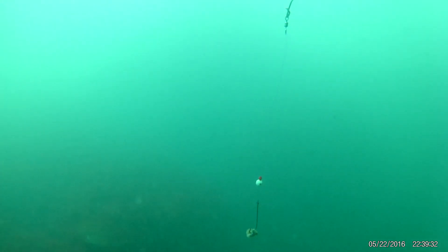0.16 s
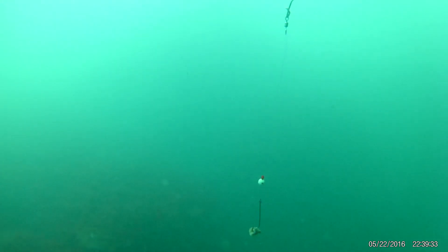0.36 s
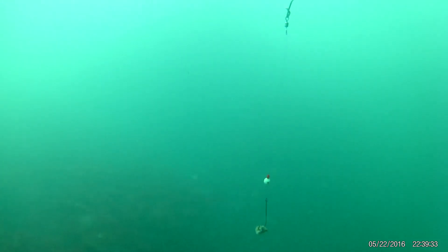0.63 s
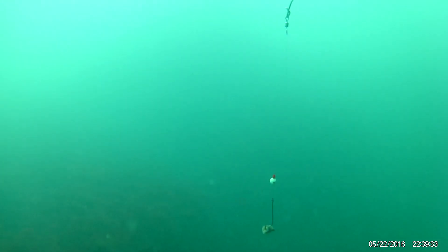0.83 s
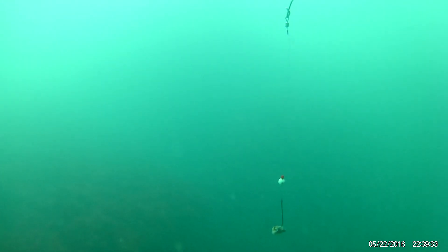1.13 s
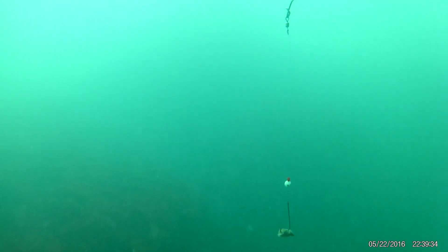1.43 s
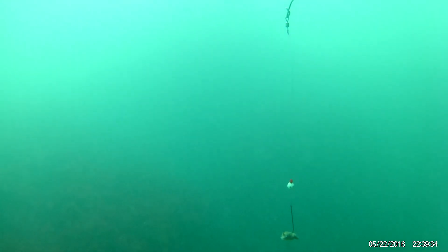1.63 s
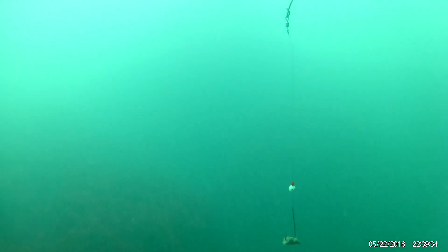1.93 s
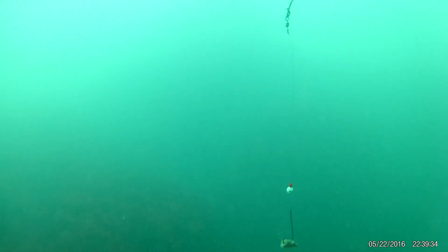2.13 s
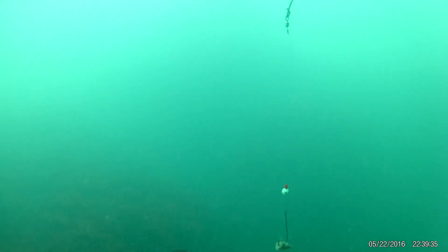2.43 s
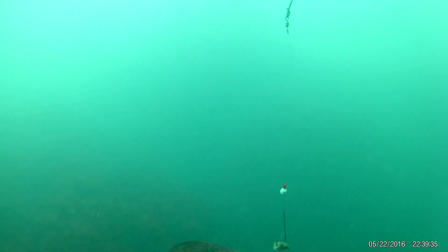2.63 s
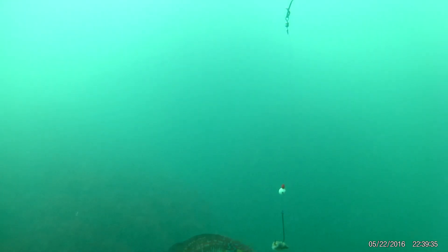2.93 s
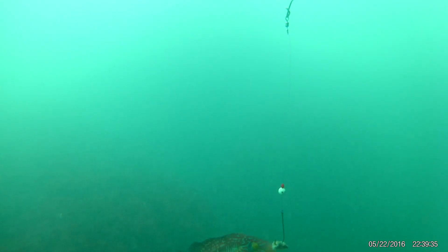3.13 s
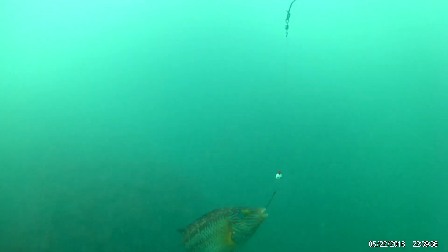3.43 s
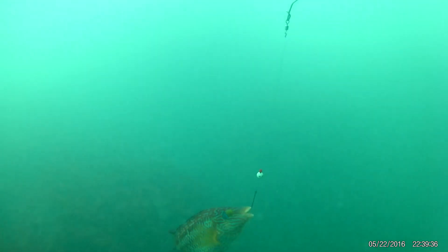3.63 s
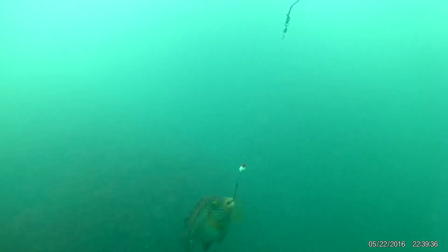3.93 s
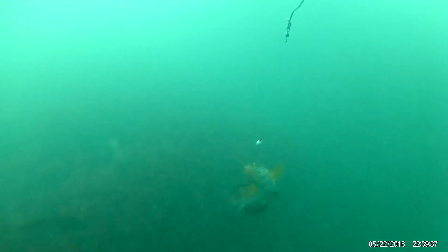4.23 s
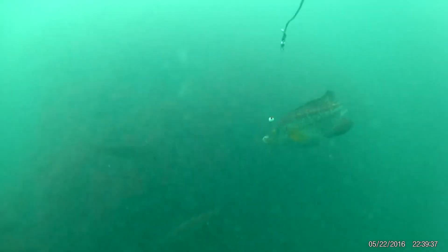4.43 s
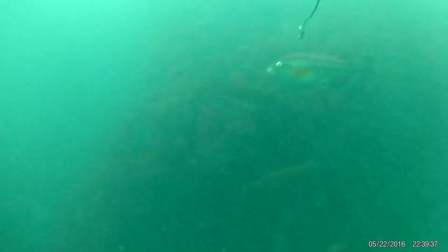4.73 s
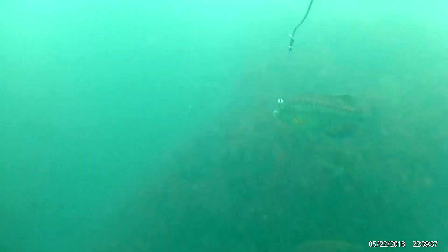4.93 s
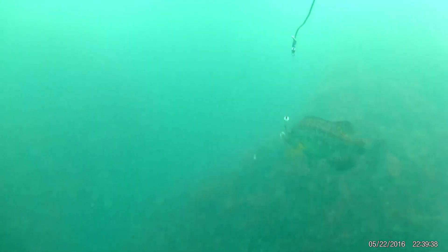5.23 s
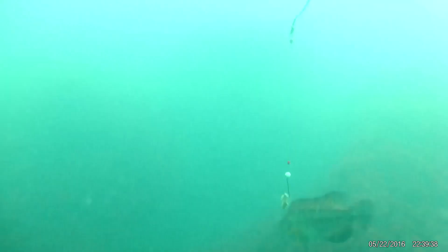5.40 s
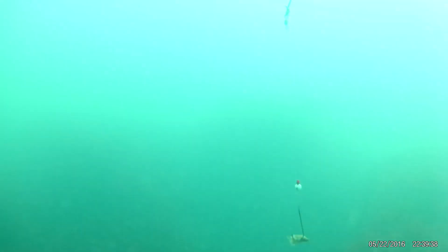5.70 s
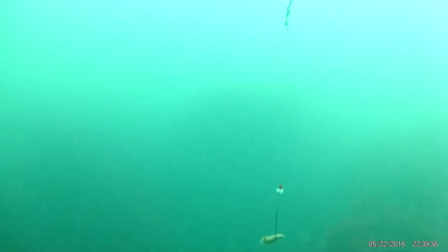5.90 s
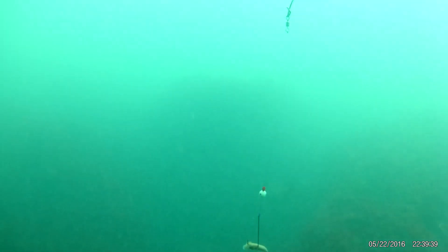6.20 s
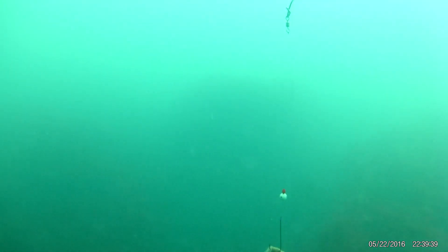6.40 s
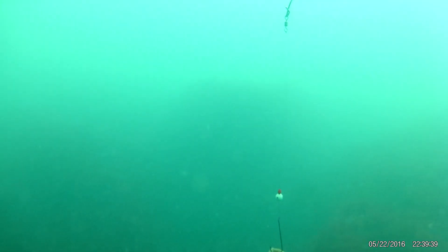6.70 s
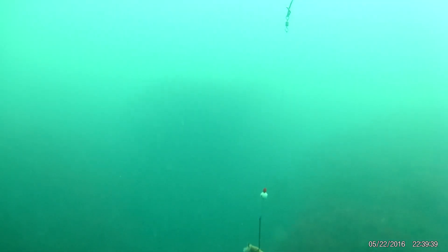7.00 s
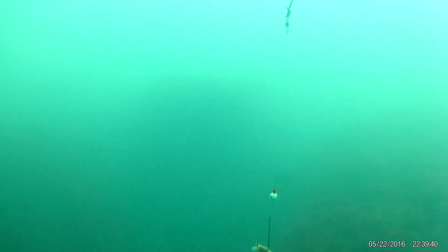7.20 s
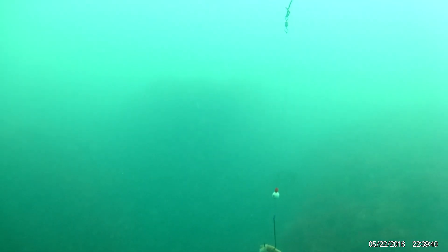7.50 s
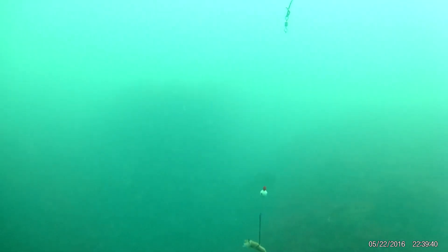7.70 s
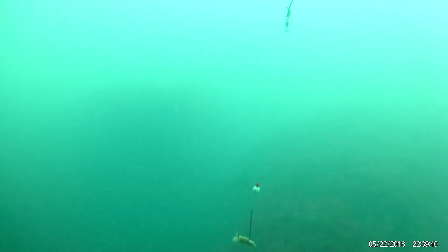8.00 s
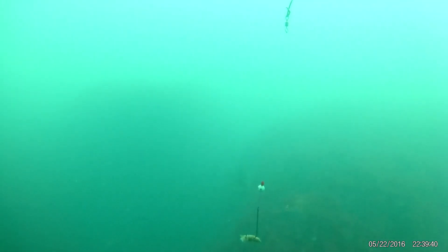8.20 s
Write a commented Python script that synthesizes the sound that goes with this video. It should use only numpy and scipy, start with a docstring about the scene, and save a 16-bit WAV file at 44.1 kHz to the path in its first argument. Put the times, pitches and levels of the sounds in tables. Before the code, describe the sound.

From 0 to 3.2 seconds a quiet, steady, muffled water hum fills a closed plastic case, with faint hiss, tiny ticks and soft bubble blips, the clearest near 0.35. At 3.24 a fish strikes: several very hard, hollow knocks within 50 milliseconds, overloading the microphone, with bright plastic chatter and a short burst of low turbulence. Small tackle taps fade by 3.5. A weak bump and light line creeping come around 3.9 to 4.25. At 4.3 to 4.45 heavy low jerks, a deep bubble-like thump, grinding, rattle, tiny metal clinks and short squeaks crowd together. Another tug at 4.65 to 4.9 brings thuds and a string of chirpy squeaks sliding down, with lower faint groans until 5.27. Soft bumps at 5.35 and 5.45, light taps and creeping until about 6.1, two small ticks near 6.55, a soft bubble ring at 7.5, and dull hum to the end.

```python
"""Under water, inside a watertight camera housing hung on a fishing line above a baited hook.
Coloured noise hums dully through the case, with small ticks and bubbles ringing as dying sines.
A fish strikes: blows ring the housing's modes, tackle chatters on its shell, and lurches stir up turbulence.
The rig is dragged off in jerks; the taut line rasps and clinks in bursts of tiny contacts.
Its stick-slip squeaks fall in pitch as it slackens; then creeping, a few ticks and bubbles, and the hum."""
import sys
import numpy as np
from scipy import signal
from scipy.fft import rfft, irfft
from scipy.io import wavfile

SR = 44100
rng = np.random.default_rng(int(sys.argv[2]) if len(sys.argv) > 2 else 0)


def materialize(psi):
    """Save the field psi as 16-bit PCM at rate SR to the path in sys.argv[1].

    A 1-D psi becomes a single channel; in a 2-D psi each row is a channel.
    """
    bounded = np.clip(np.atleast_2d(psi).T, -1, 1)
    quanta = np.round(bounded * 32767).astype(np.int16)
    wavfile.write(sys.argv[1], SR, quanta)


N = 368224
T = np.arange(N) / SR  # seconds

# colour of the water noise inside the case: (frequency [Hz], relative density [dB per Hz])
WATER_COLOUR = [(20, -25), (31, -14), (45, -9.5), (75, -0.5), (125, -14.5), (180, -11.5), (250, -6),
                (320, -8), (480, -4), (640, -6.5), (800, -16.5), (1080, -33), (1500, -39.5), (2400, -43.5),
                (4000, -57)]
# air resonances of the case, stirred by the water: (frequency [Hz], width [Hz], level [dB])
CASE_AIR = [(543.8, 24.6, -50.5), (606.8, 26.6, -53), (1285, 105, -68), (2710, 230, -87)]
# colour of the microphone hiss: (frequency [Hz], relative density [dB per Hz])
HISS_COLOUR = [(1500, -0.5), (3000, -3.5), (5000, -8.5), (8000, -16.5), (12000, -17.5), (15500, -10.5)]
WATER_DB, HISS_DB = -46, -75  # rms levels

# sharp ticks out in the water: (time [s], level [dB])
WATER_TICKS = [(.0604, -39), (.328, -43), (0.9633, -43), (1.995, -40.5), (6.5281, -42), (6.6094, -36)]
# bubbles ringing near the case: (time [s], frequency [Hz], level [dB], t60 [s])
BUBBLE_RINGS = [(0.343, 603, -25.5, 0.15), (0.536, 556, -36.5, 0.16), (1.45, 1356, -53.5, 0.18),
                (1.537, 2830, -46, 0.019), (2.416, 2660, -52, 0.025), (2.557, 2840, -42, 0.011),
                (3.768, 775, -33, 0.031), (4.3079, 252, -2.5, 0.027), (4.964, 236.4, -4.5, 0.073),
                (6.265, 886, -50, 0.15), (7.52, 550, -29.5, 0.3)]

# lurches of the case, buffeted by water: (time [s], level [dB], fall [dB/s])
CASE_LURCHES = [(3.262, -7, 191), (3.95, -43.5, 11), (4.318, -22.5, 61), (4.7, -33, 18), (5.55, -42, 22)]
# colour of that turbulence: (frequency [Hz], relative density [dB per Hz])
TURBULENCE_COLOUR = [(20, -6.5), (48, 1), (75, 0.5), (110, -8.5), (190, -6.5), (300, -20.5), (600, -15),
                     (1000, -40), (2000, -95.5)]
LURCH_RISE_S = 0.035
# fainter eddies start with each lurch, at a level relative to it, and outlast only the fast-falling ones
EDDY_DB, EDDY_FALL_DB_PER_S = -32.5, 31

# hard blows on the rig: (time [s], impulse [dB], contact [ms], tackle chatter [dB])
BLOWS = [(3.2367, 0.5, 1.1, -30), (3.2436, -1, 0.71, -24.5), (3.2535, -5.5, 0.98, -28.5),
         (3.2629, -18.5, 0.35, -24), (3.2837, -22, 0.36, -23), (3.896, -25.5, 5.6, -69),
         (4.311, -13, 1.8, -40.5), (4.377, -22.5, 3.1, -34), (4.667, -17.5, 1.96, -57),
         (5.349, -31.5, 1.6, -70), (5.449, -20.5, 1.64, -53)]
# low modes of housing and mount: (frequency [Hz], level [dB], t60 [s])
HOUSING_MODES = [(49.7, -20.5, 1), (60, -38, 0.5), (87.5, -38.5, 0.3), (108.6, -6, 0.29),
                 (127.2, -29, 0.37), (176, -19, 0.21), (188.1, -12.5, 0.28), (242.3, -5.5, 0.11),
                 (284, -13, 0.086), (366, -10.5, 0.24), (434.8, -10, 0.084), (522, -12, 0.25),
                 (608.8, -12, 0.36), (622.5, -13, 0.28), (734, -26.5, 0.3), (850, -21, 0.15),
                 (875, -36, 0.22), (1138, -29.5, 0.33), (1308, -42, 0.28)]

# swivel and clip swinging against the case: (time [s], level [dB])
TACKLE_TOUCHES = [(3.302, -32), (3.3145, -27.5), (3.335, -26), (3.3755, -42.5), (3.395, -45.5),
                  (3.433, -53), (3.465, -54.5), (3.809, -57.5), (3.9143, -61), (4.346, -37), (4.400, -39),
                  (4.4085, -33.5), (4.4215, -62), (4.443, -47), (4.743, -49.5), (5.371, -57), (5.409, -58),
                  (5.585, -51.5), (5.609, -44), (5.724, -51.5), (5.748, -50.5)]
# wall resonances of the plastic shell: (frequency [Hz], width [Hz], relative level [dB])
SHELL_MODES = [(1570, 110, -0.5), (1882, 85, 7.5), (2156, 75, 2), (2272, 93, 7.5), (2390, 52, 2.5),
               (2810, 120, 4.5), (2973, 140, 4), (3230, 88, -0.5), (3840, 120, 2), (4095, 180, 1.5),
               (4480, 54, -9), (4410, 69, -2), (5800, 71, -17), (6070, 160, -9), (6220, 130, -15.5),
               (6900, 120, -20.5), (8850, 130, -17.5), (10400, 400, -17)]
# a touch of -30 dB is cut above CHATTER_HZ; the cut rises an octave per DB_PER_OCTAVE of force
CHATTER_HZ, DB_PER_OCTAVE = 7500, 22
# time constants of the chatter's build-up and decay, and of the faint buzz it leaves behind
CHATTER_RISE_MS, CHATTER_MS, BUZZ_DB, BUZZ_MS = 1.4, 5.4, -24, 14.4

# line creeping over the shell under light tension: (time [s], hold [s], level [dB])
LINE_SLIDES = [(3.894, 0.052, -69.5), (4.083, .135, -63.5), (4.251, 0.069, -61), (4.485, .02, -67.5),
               (4.66, 0.034, -64), (5.6, 0.2, -70.5), (5.938, 0.082, -71.5)]
# wall resonances the creeping line picks out: (frequency [Hz], width [Hz], relative level [dB])
CREEP_MODES = [(1530, 37, -5), (1895, 93, 2.5), (2160, 57, 3), (2400, 80, -1), (2820, 150, -5),
               (3220, 200, -16.5), (4010, 250, -16)]
SLIDE_RISE_S, SLIDE_FALL_DB_PER_S = 0.022, 170
SLIDE_RASP_DB = -4.5  # rasp effort relative to the creep

# stick-slip squeaks of the line:
# (time [s], length [s], first pitch [Hz], last pitch [Hz], level [dB], relative second harmonic [dB])
LINE_SQUEAKS = [(4.069, 0.082, 192, 198, -41, -19), (4.085, 0.13, 588, 639, -41, -29),
                (4.317, 0.081, 526, 570, -28, -25), (4.404, 0.013, 595, 582, -16, -25),
                (4.423, .02, 599, 553, -17, -32), (4.436, 0.035, 525, 600, -27.5, -36),
                (4.719, 0.022, 568, 603, -26.5, -33), (4.752, .018, 610, 584, -23.5, -27),
                (4.771, 0.022, 538, 516, -24.5, -31), (4.796, 0.029, 578, 539, -23.5, -20),
                (4.826, 0.027, 521, 554, -22.5, -30.5), (4.846, 0.055, 418, 345, -27, -35),
                (4.898, .07, 339.5, 288.4, -38.5, -14.5), (5.05, 0.096, 200, 199.4, -32, -29.5),
                (5.144, 0.05, 188.6, 196, -32.5, -32), (5.19, 0.078, 137, 132, -41, -27)]
SQUEAK_ARCH = 0.49  # power of the sine arch on which each squeak swells and fades

# pulls dragging line and case over the mount:
# (time [s], hold [s], grinding [dB], rasp effort [dB], fall [dB/s])
LINE_PULLS = [(4.307, 0.03, -28, -46.5, 296), (4.412, 0.033, -25, -50.5, 650),
              (4.731, 0.015, -32.5, -48, 477), (4.791, .015, -43, -63.5, 89)]
# mount resonances stirred by the grinding: (frequency [Hz], width [Hz], relative level [dB])
MOUNT_MODES = [(394, 160, 10.5), (650, 72, 3), (810, 200, -4.5), (1100, 98, -9.5), (1190, 130, -7),
               (1350, 200, -15.5), (1840, 300, -24.5)]
GRIP_S = .02  # rise of a pull

# line jerks shoving the case through the water: (time [s], level [dB], length [ms])
LINE_JERKS = [(4.302, -5.5, 6.3), (4.332, -4.5, 9.6), (4.438, -8.5, 12), (4.652, -12.5, 12),
              (4.738, -14.5, 8.7)]
RECOIL, RECOIL_DELAY = 0.27, .75  # the mount springs back: share of the shove, delay in shove lengths

# swivel clinking as the line snaps taut: (time [s], level [dB])
SWIVEL_CLINKS = [(4.377, -50), (4.401, -52), (4.41, -48.5), (4.423, -61), (4.668, -74)]
CLINK_HZ, CLINK_WIDTH_HZ = 6020, 510
CLINK_RISE_S, CLINK_FALL_DB_PER_S = 0.002, 1198  # the rise time is also the hold

CUTOFF_HZ = 15800  # top of the recorded band


def from_db(db):
    """Decibels to gain."""
    return 10 ** (np.asarray(db) / 20)


def rms_one(x):
    """Scale to unit rms."""
    return x / np.sqrt(np.mean(x ** 2) + 1e-20)


def drift(rate_hz):
    """Slow random wander of rms 1, made at a fortieth of the sample rate and interpolated."""
    r = np.exp(-80 * np.pi * rate_hz / SR)
    draws = rng.standard_normal(N // 40 + 2002)
    slow = signal.lfilter([1], [1, -2 * r, r * r], draws)[2000:]  # drop the filter's start
    return np.interp(np.arange(N) / 40, np.arange(len(slow)), rms_one(slow))


def noise(colour):
    """Steady noise of a given colour, rms 1, thinning out below the first frequency."""
    hz, db = np.transpose(colour)
    bins = np.maximum(np.fft.rfftfreq(N, 1 / SR), 1)
    gain = from_db(np.interp(np.log(bins), np.log(hz), db))
    gain = gain * np.minimum(bins / hz[0], 1)
    return rms_one(irfft(rfft(rng.standard_normal(N)) * gain, N))


def cut(x, hz, kind, order=2):
    """Butterworth high- or low-pass."""
    sos = signal.butter(order, min(hz, .45 * SR), kind, fs=SR, output="sos")
    return signal.sosfilt(sos, x + 1e-18)


def resonance(x, hz, width):
    """Two-pole band-pass with a gain of about 1 on top."""
    r = np.exp(-np.pi * width / SR)
    feedback = [1, -2 * r * np.cos(2 * np.pi * hz / SR), r * r]
    return signal.lfilter(np.array([1, 0, -1]) * (1 - r * r) / 2, feedback, x + 1e-18)


def ring(force, hz, t60):
    """A decaying mode: a unit click sets a sine of starting height 1 ringing."""
    r, w = np.exp(-np.log(1000) / (t60 * SR)), 2 * np.pi * hz / SR
    return signal.lfilter([0, np.sin(w)], [1, -2 * r * np.cos(w), r * r], force + 1e-18)


def push(s, ms):
    """A smooth one-sided pulse of height 1."""
    part = (T - s) * 1000 / ms
    inside, out = (part > 0) & (part < 1), np.zeros(N)
    out[inside] = np.sin(np.pi * part[inside]) ** 2
    return out


def grains(per_s, spread_db):
    """Tiny contacts of uneven size at random moments, rms 1."""
    sizes = from_db(spread_db * np.minimum(rng.exponential(1, N), 3))
    sizes = sizes * rng.choice([-1, 1], N)
    return rms_one(sizes * (rng.random(N) < per_s / SR))


def swell(s, hold_s, rise_s, fall_db_per_s):
    """Gain that reaches 1 at time s, holds, then dies away."""
    rise = np.clip(1 + (T - s) / rise_s, 0, 1) ** 2
    return rise * from_db(-abs(fall_db_per_s) * np.maximum(T - s - hold_s, 0))


def together(gains):
    """Joint gain of unrelated swells: their powers add."""
    return np.sqrt(sum(gain ** 2 for gain in gains))


def shell(force, thud_db, thud_hz, top_hz=9000):
    """Small contacts ring the plastic walls and thud dully inside."""
    walls, power = 0, 0
    for hz, width, db in SHELL_MODES:
        walls = walls + from_db(db) * resonance(resonance(force, hz, width), hz, 8 * width)
        power += from_db(db) ** 2 * np.pi * width / SR
    thud = from_db(thud_db) * cut(cut(force, thud_hz, "low"), 240, "high")
    # dividing by the walls' noise gain keeps the level in hand
    return (cut(walls, top_hz, "low") + cut(thud, 1500, "low", order=3)) / np.sqrt(power)


def friction(effort, bands, per_s, uneven_db, top_hz):
    """Dense small slips ring a set of resonances; the case muffles what lies above them."""
    slips = grains(per_s, spread_db=1.0) * from_db(uneven_db * drift(50))
    sound = sum(from_db(db) * resonance(resonance(slips, hz, width), hz, 5 * width)
                for hz, width, db in bands)
    return effort * rms_one(cut(sound, top_hz, "low", order=4))


def hum(waver_db=-0.18):
    """Gently wavering water noise and the air resonances it stirs, over steady microphone hiss."""
    water = from_db(WATER_DB) * noise(WATER_COLOUR)
    for hz, width, db in CASE_AIR:
        stirred = resonance(rng.standard_normal(N), hz, width)
        water = water + from_db(db) * rms_one(resonance(stirred, hz, 4 * width))
    return water * from_db(waver_db * drift(2.8)) + from_db(HISS_DB) * noise(HISS_COLOUR)


def ticks(ping_hz=2750, ping_width=260, ping_db=9):
    """Lone clicks carried through the water ping the shell."""
    force = np.zeros(N)
    for s, db in WATER_TICKS:
        force[round(s * SR)] += from_db(db)
    ping = from_db(ping_db) * resonance(force, ping_hz, ping_width)
    return shell(force, thud_db=1, thud_hz=1510, top_hz=3000) + ping


def bubbles(swell_s=0.0022):
    """Each bubble swells within milliseconds and rings out as a dying sine."""
    out = np.zeros(N)
    for s, hz, db, t60 in BUBBLE_RINGS:
        on = (T > s) & (T < s + 2 * t60)
        age = T[on] - s
        gain = from_db(db) * (1 - np.exp(-age / swell_s)) * np.exp(-np.log(1000) * age / t60)
        out[on] += gain * np.sin(2 * np.pi * hz * age)
    return out


def wake():
    """Turbulence flares and dies away at each lurch, with fainter eddies under it."""
    flare = together(from_db(db) * swell(s, 0, LURCH_RISE_S, fall) for s, db, fall in CASE_LURCHES)
    eddies = together(from_db(db + EDDY_DB) * swell(s, 0, LURCH_RISE_S, EDDY_FALL_DB_PER_S)
                      for s, db, _ in CASE_LURCHES)
    return together([flare, eddies]) * noise(TURBULENCE_COLOUR)


def knocks(leak_hz=40):
    """Blows ring the housing; a longer contact leaves only the lowest modes, and the slowest push leaks away."""
    force = np.zeros(N)
    for s, db, ms, _ in BLOWS:
        contact = push(s, ms)
        force += from_db(db) * contact / (contact.sum() + 1e-9)  # equal impulse at any length
    ringing = sum(from_db(db) * ring(force, hz, t60) for hz, db, t60 in HOUSING_MODES)
    return cut(ringing, leak_hz, "high")


def rattle(first_db=2, chatter_db=3):
    """Each touch of the tackle is a crack and a short dying chatter; harder touches are brighter."""
    force, chatter = np.zeros(N), from_db(chatter_db) * grains(per_s=2900, spread_db=2.5)
    touches = [(s, db) for s, _, _, db in BLOWS] + list(TACKLE_TOUCHES)
    for s, db in touches:
        on = (T >= s) & (T < s + .15)
        ms = (T[on] - s) * 1000
        dying = np.exp(-ms / CHATTER_MS) + from_db(BUZZ_DB) * np.exp(-ms / BUZZ_MS)
        touch = chatter[on] * dying * (1 - np.exp(-ms / CHATTER_RISE_MS))
        touch[0] += from_db(first_db)  # the crack
        bright_hz = CHATTER_HZ * 2 ** ((db + 30) / DB_PER_OCTAVE)
        force[on] += from_db(db) * cut(touch, bright_hz, "low")
    return shell(force, thud_db=-4.5, thud_hz=970)


def rubbing():
    """How hard the rig grinds, creeps and rasps: pulls grind, slides creep, and both rasp the line."""
    pulls = [(swell(s, hold, GRIP_S, fall), grind_db, rasp_db)
             for s, hold, grind_db, rasp_db, fall in LINE_PULLS]
    grinding = together(from_db(db) * pull for pull, db, _ in pulls)
    creeping = together(from_db(db) * swell(s, hold, SLIDE_RISE_S, SLIDE_FALL_DB_PER_S)
                        for s, hold, db in LINE_SLIDES)
    pull_rasps = [from_db(db) * pull for pull, _, db in pulls]
    rasping = together(pull_rasps + [from_db(SLIDE_RASP_DB) * creeping])
    return grinding, creeping, rasping


def creep(effort):
    """The line slips lightly over the shell and picks out some of its wall resonances."""
    return friction(effort, CREEP_MODES, per_s=1600, uneven_db=5.5, top_hz=4400)


def rasp(effort, uneven_db=0.5):
    """The line catches on its mount in dense small slips."""
    strength = effort * from_db(uneven_db * drift(24))
    slips = strength * grains(per_s=2000, spread_db=13.5)
    return shell(slips, thud_db=16.5, thud_hz=950, top_hz=5000)


def squeaks(effort, jitter=0.023, rough_db=24, shimmer_db=1.14, third_db=-35,
            case_hz=605, case_width=70, case_db=23, muffle_hz=1150, snap_db=-16):
    """Stick-slip tones roughen with the rasp; overtones swell near a case resonance, and slips snap."""
    unevenness = np.minimum(from_db(rough_db) * effort, .3)
    waver = 1 + jitter * drift(49) + unevenness * drift(160)  # pitch factor
    flutter = shimmer_db * drift(33)
    out, snaps = np.zeros(N), np.zeros(N)
    for s, length, first_hz, last_hz, level, second_db in LINE_SQUEAKS:
        on = (T > s) & (T < s + length)
        part = (T[on] - s) / length
        hz = first_hz * (last_hz / first_hz) ** part
        phase = 2 * np.pi * np.cumsum(hz * waver[on]) / SR
        tone = np.sin(phase)
        for k, db in enumerate([second_db, third_db], 2):
            lift = 1 + from_db(case_db) / np.hypot(1, 2 * (k * hz - case_hz) / case_width)
            muffle = 1 / np.hypot(1, (k * hz / muffle_hz) ** 12)
            tone += from_db(db) * lift * muffle * np.sin(k * phase)
        gain = from_db(level + flutter[on]) * np.abs(np.sin(np.pi * part)) ** SQUEAK_ARCH
        out[on] += np.sqrt(2) * gain * tone
        snaps[on] += gain * np.diff(phase // (2 * np.pi), prepend=0)  # one click per cycle
    return out + from_db(snap_db) * shell(snaps, thud_db=-14, thud_hz=1000, top_hz=3800)


def grind(effort):
    """Pulls drag line and case over the mount in small slips that stir its resonances."""
    return friction(effort, MOUNT_MODES, per_s=690, uneven_db=5.0, top_hz=1900)


def jerks(leak_hz=29, sway_hz=50, sway_width=9):
    """Each jerk is a pressure pulse and a recoil that leak away and leave the mount swaying."""
    pressure = np.zeros(N)
    for s, db, ms in LINE_JERKS:
        recoil = RECOIL * push(s + RECOIL_DELAY * ms / 1000, ms)
        pressure += from_db(db) * (recoil - push(s, ms))
    return cut(pressure, leak_hz, "high") + resonance(pressure, sway_hz, sway_width)


def clinks():
    """A short shiver of tiny contacts rings the metal swivel."""
    shiver = together(from_db(db) * swell(s, CLINK_RISE_S, CLINK_RISE_S, CLINK_FALL_DB_PER_S)
                      for s, db in SWIVEL_CLINKS)
    metal = resonance(grains(per_s=2600, spread_db=2.0), CLINK_HZ, CLINK_WIDTH_HZ)
    metal = resonance(metal, CLINK_HZ, 2 * CLINK_WIDTH_HZ)
    return shiver * rms_one(metal)


def scene():
    """Everything reaches one microphone through the housing."""
    grinding, creeping, rasping = rubbing()
    water = hum() + ticks() + bubbles() + wake()
    strike = knocks() + rattle() + jerks() + clinks()
    line = creep(creeping) + rasp(rasping) + squeaks(rasping) + grind(grinding)
    return (water + strike + line)[None]


def record(dry):
    """The hardest blow overloads the input, which limits softly; the top is cut."""
    limited = dry / (1 + dry ** 14) ** (1 / 14)
    top_cut = signal.ellip(10, .1, 80, CUTOFF_HZ, fs=SR, output="sos")
    return signal.sosfilt(top_cut, limited)


dry = scene()
out = record(dry)
materialize(out)
```